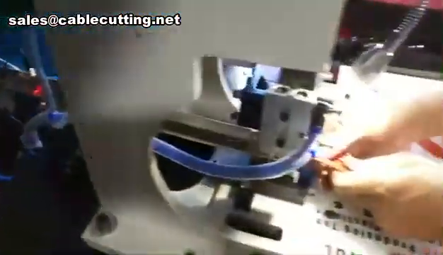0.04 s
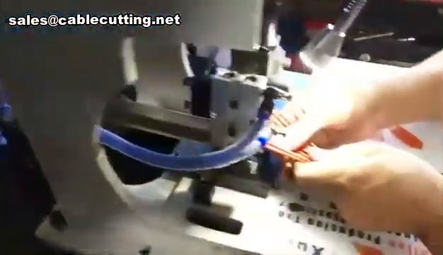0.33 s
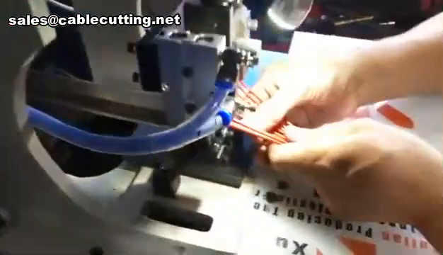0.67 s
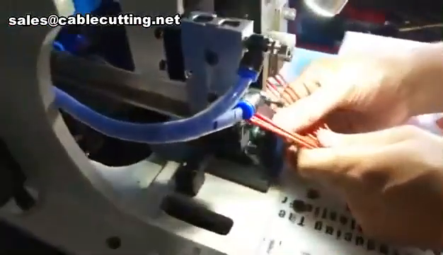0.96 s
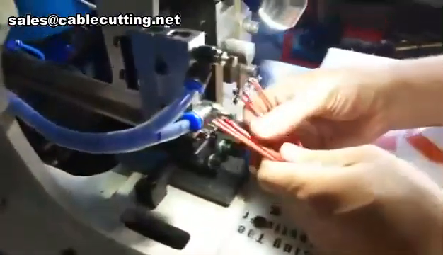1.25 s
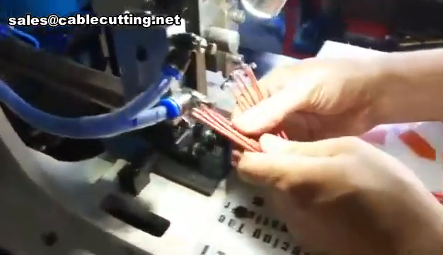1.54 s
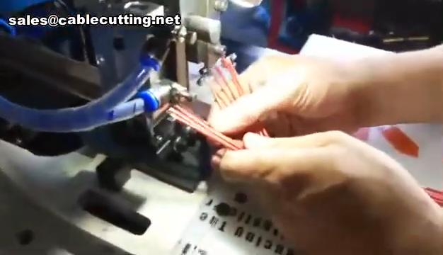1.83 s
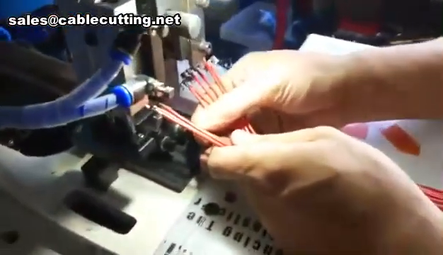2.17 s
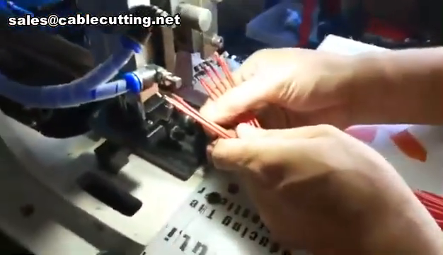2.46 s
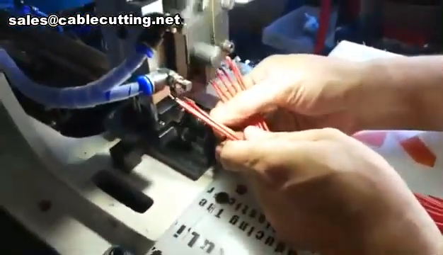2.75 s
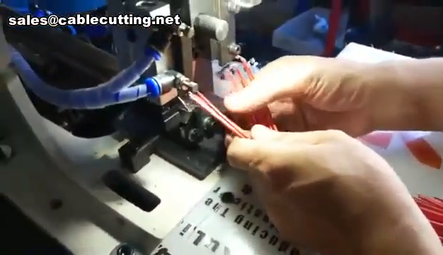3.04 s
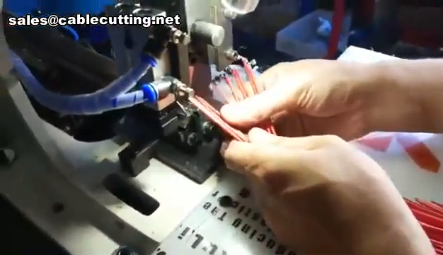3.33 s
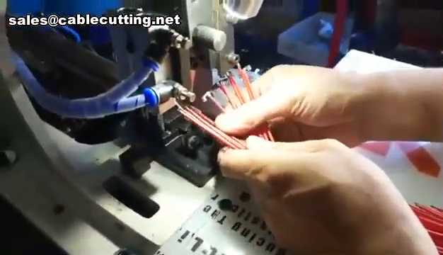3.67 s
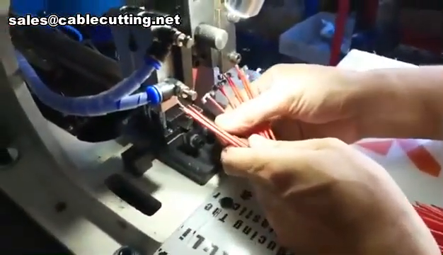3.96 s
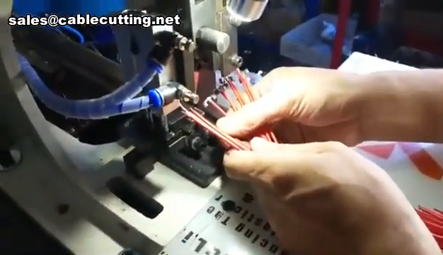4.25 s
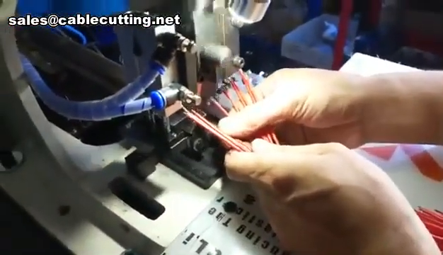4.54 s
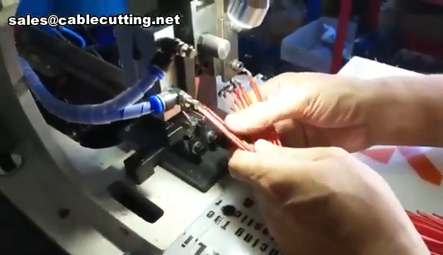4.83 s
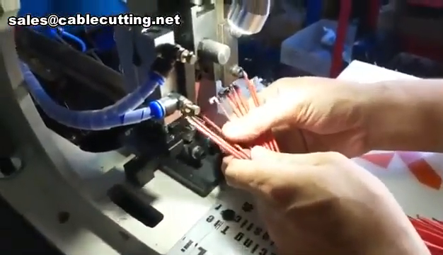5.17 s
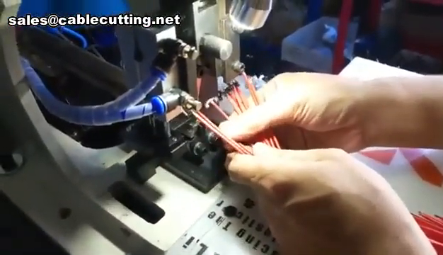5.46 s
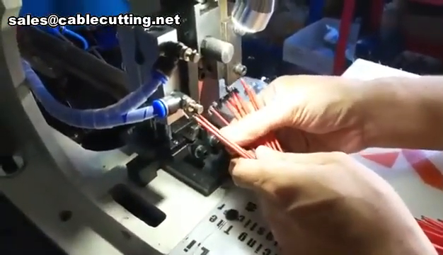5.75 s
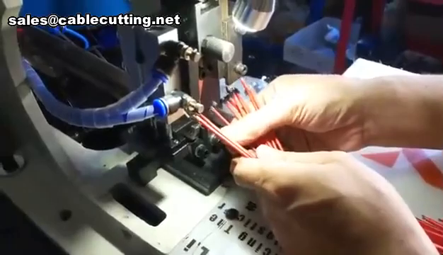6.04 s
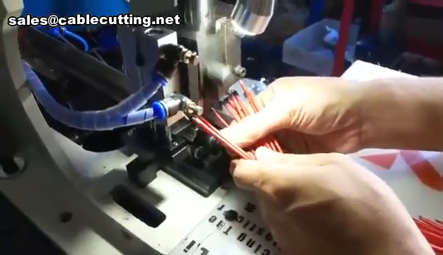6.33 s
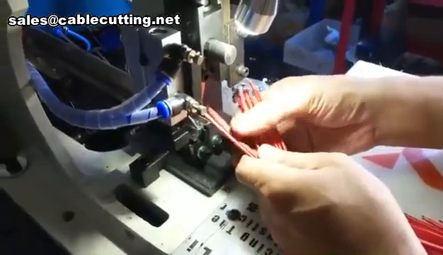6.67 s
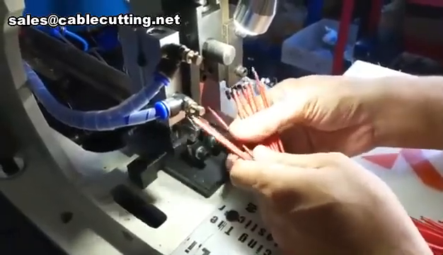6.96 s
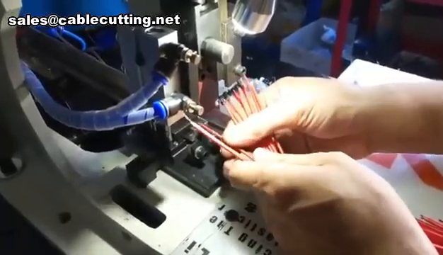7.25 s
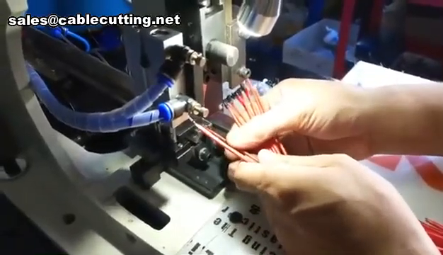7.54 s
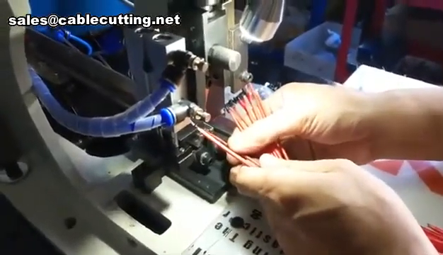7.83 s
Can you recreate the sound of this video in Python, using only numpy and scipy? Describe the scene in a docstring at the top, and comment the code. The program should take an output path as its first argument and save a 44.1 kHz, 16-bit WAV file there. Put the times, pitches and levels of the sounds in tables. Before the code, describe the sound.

A wire crimping press clacks and bangs five times, each stroke followed by a hiss of air, over a growing motor hum.

```python
"""Crimping press in a workshop

The microphone moves up close to the humming motor of a terminal press, the shop murmuring behind.
Five times a wire is slid in, the clutch clacks, the ram rumbles down and crimps, and the crank bangs
on its stop; an air jet hisses after it. Gain control ducks each stroke: the hum sinks and swells back."""
import sys
import numpy as np
from scipy import signal
from scipy.fft import rfft, irfft, next_fast_len
from scipy.io import wavfile
from scipy.ndimage import uniform_filter1d, minimum_filter1d, map_coordinates

SR = 44100
rng = np.random.default_rng(int(sys.argv[2]) if len(sys.argv) > 2 else 0)


def wav_record(signal):
    """Record a signal, one row per channel, as 16-bit PCM in the file named by sys.argv[1]."""
    frames = np.transpose(np.atleast_2d(signal))
    bounded = np.clip(frames, -1, 1)
    # unit amplitude maps onto the largest positive 16-bit level
    quanta = np.round(bounded * 32767).astype(np.int16)
    wavfile.write(sys.argv[1], SR, quanta)


N = 357033
T = np.arange(N) / SR
MAINS_HZ = 50

# press cycles, timed from the clutch: t/s, pawl/dB, bite/dB, crimp/dB, stop/dB, ram/dB, air jet/dB
STROKES = [(0.8986, 2, 0, -5.5, 0, -2, -16), (2.767, -2, -6.5, 0, -0.5, -1, -16),
           (4.499, 2, 0, 0.5, 0.5, 0.5, -15), (6.3182, -3, 0.5, 1, 1.5, 0, -14),
           (8.001, 0.5, -0.5, -2, -4.5, -4, -16.5)]
# modes of the clutch and of the crimping die: f/Hz, level/dB, t60/s
CLUTCH_MODES = [(705, -2, 0.055), (960, -7.5, 0.042), (1187, -9.5, 0.091), (1336, -2, 0.066),
                (1565, -11.5, 0.093)]
DIE_MODES = [(814, 0.5, 0.048), (1227, -2.5, 0.069), (1312, -1.5, 0.088), (1390, -2, 0.18),
             (1453, -3, 0.049), (1590, -6.5, 0.17), (1797, 1, 0.1), (1997, -9.5, 0.097), (2264, -7, 0.094),
             (2432, -2, 0.17), (2803, -6.5, 0.17), (3330, -13, 0.079), (3500, -4.5, 0.1)]
# spectra of the blades closing and of a heavy steel blow: f/Hz, level/dB
SNAP_SPECTRUM = [(300, -20.5), (800, -1), (1500, 2.5), (2200, -0.5), (2700, -10), (3500, -1), (4200, -9),
                 (4800, -7.5), (7500, -12)]
CLUNK_SPECTRUM = [(100, -7), (350, -3), (480, -10.5), (660, 5.5), (950, -7.5), (1300, -9), (1900, -16.5),
                  (3500, -16), (7500, -17.5)]


def amp(db):
    return 10 ** (np.asarray(db) / 20)


def unit(x):
    return x / np.sqrt(np.mean(x ** 2) + 1e-20)


def along(points, hz):
    """Read (f/Hz, value) points on a log frequency axis."""
    f, v = np.transpose(points)
    return np.interp(np.log(hz + 1), np.log(f + 1), v)


def wobble(rate):
    """A smooth random curve, rate knots a second."""
    return map_coordinates(rng.standard_normal(int(N * rate / SR) + 4), [T * rate])


def gate(length, rise, fall):
    """A one-second envelope that opens at 0 and closes after length seconds."""
    t = T[:SR]
    return (1 - np.exp(-t / rise)) * np.exp(-np.maximum(t - length, 0) / fall)


def add(track, s, sound):
    """Mix a sound in at time s."""
    part = track[:, round(s * SR):][:, :sound.shape[1]]
    part += sound[:, :part.shape[1]]


def spread(hz):
    """Angle between mid and side at the stereo microphone."""
    likeness = [(100, 0.98), (300, 1), (500, 0.68), (1000, 0.37), (1900, -0.35), (4000, 0.071),
                (5500, -0.086), (7300, 0.94)]  # f/Hz, left-right correlation
    return np.arccos(np.clip(along(likeness, hz), -1, 1)) / 2


def noise(gain, size):
    """Stereo noise of rms 1, coloured by a gain of frequency."""
    m = next_fast_len(size)
    hz = np.fft.rfftfreq(m, 1 / SR)
    coloured = rfft(rng.standard_normal((2, m))) * gain(hz)
    mid, side = irfft(coloured * [np.cos(spread(hz)), np.sin(spread(hz))], m)[:, :size]
    return unit(np.array([mid + side, mid - side]))


def rush(spectrum, size=SR):
    """Stereo noise with a given spectral shape."""
    return noise(lambda hz: amp(along(spectrum, hz)), size)


def peak(hz, centre_hz, width_hz):
    """A resonance curve of height 1."""
    return 1 / (1 + (2 * (hz - centre_hz) / width_hz) ** 2)


def narrow(centre_hz, width_hz):
    """Stereo noise in one resonance."""
    return noise(lambda hz: peak(hz, centre_hz, width_hz), N)


def burst(spectrum, t60):
    """The dense, quickly dying part of a blow."""
    t = T[:SR]
    contact = 1 - np.exp(-t / .0007)
    return rush(spectrum) * amp(-60 * t / t60) * contact


def ring(modes):
    """Struck modes, varying in strength from blow to blow and slightly shifted by the load."""
    t, out = T[:SR // 2], np.zeros((2, SR))
    for hz, db, t60 in modes:
        phase = 0.66 * rng.standard_normal() + spread(hz) * np.array([[1], [-1]])
        loaded_hz = hz * (1 + 0.0036 * rng.standard_normal())
        decay = amp(db + rng.normal(0, 1) - 60 * t / t60)
        out[:, :len(t)] += decay * np.sin(2 * np.pi * loaded_hz * t + phase)
    return out * (1 - np.exp(-T[:SR] / .0008))


def motor():
    """Magnetic hum at twice the mains, overtones and whirring bearings grow as the microphone nears."""
    approach = [(0, -20.5, -34), (.8, -17.5, -12), (1.95, -16.5, -11), (2.3, -7.5, -11.5), (2.7, -2, -4),
                (4.2, -0.5, 1), (8.1, 1, 0.55)]  # the walk up to the motor: t/s, hum/dB, overtones and whir/dB
    # the hum's overtones and its odd-order buzz: multiple of the mains, level/dB
    overtone_orders = [(4, 0.5), (6, -3), (8, -13), (10, -16), (12, -26.5), (13, -23.5), (14, -17.5),
                       (18, -18), (20, -16), (22, -25), (34, -24)]
    buzz_orders = [(1, -15.5), (3, -9), (5, -6), (7, -7)]
    whine_bands = [(925, 55, -18), (1177, 33, -12.5), (1395, 20, -20.5), (1459, 31, -19), (1559, 31, -16),
                   (1684, 21, -17), (1885, 26, -21)]  # bearings: f/Hz, width/Hz, level/dB
    whir_spectrum = [(25, -24), (50, -11.5), (120, 8.5), (330, -0.5), (480, -3.5), (900, -5), (1350, -14),
                     (2000, -11.5), (2700, -4.5), (3700, -4.5), (4700, -10), (5600, -8.5), (7200, -9)]  # running noise: f/Hz, level/dB
    times, *levels = np.transpose(approach)
    near_db, bright_db = [np.interp(T, times, db) for db in levels]
    mains_phase = 2 * np.pi * MAINS_HZ * T + 0.019 * wobble(5)

    def stack(orders):
        return sum(np.sqrt(2) * amp(db + 0.96 * wobble(8.3) + 0.44 * wobble(48))
                   * np.sin(k * mains_phase + rng.uniform(0, 2 * np.pi)) for k, db in orders)

    pull = np.sin(2 * mains_phase)
    hum = amp(-20.5 + near_db) * np.sqrt(2) * pull * amp([[-1.1], [1.1]])  # a little to the right
    # the buzz dies away after each stroke and builds up again
    lull = sum(np.exp(-((T - s - .65) / 0.29) ** 2) for s, *_ in STROKES)
    overtones = amp(-28.5 + bright_db) * (stack(overtone_orders) + amp(-11 * lull) * stack(buzz_orders))
    whine = sum(amp(db + wobble(22)) * narrow(hz, width) for hz, width, db in whine_bands)
    whir = rush(whir_spectrum, N) * (1 + 0.061 * pull) * amp(1.8 * wobble(9.7))
    return hum + overtones + amp(-26 + bright_db) * (amp(-1) * whir + whine + amp(-2.5) * loose_parts())


def loose_parts():
    """Four loose parts shaken by the hum tap near each crest, mostly lightly, in flurries."""
    tap_spectrum = [(400, -18.5), (900, -6.5), (1500, 4.5), (2000, -9.5), (2700, -7), (3700, 2),
                    (4400, -10.5), (7500, -1.5)]  # a tap on the frame: f/Hz, level/dB
    part_modes = [(2245, 0, 0.14), (2400, -4, 0.1), (2580, -1, 0.058), (2670, -6.5, .06), (3380, 0.5, .035),
                  (3510, -0.5, .035), (3660, -1, 0.046), (3680, -2.5, .03), (3840, -2.5, 0.05),
                  (3800, -9, 0.055), (4700, -6, 0.099)]  # the parts ringing: f/Hz, level/dB, t60/s
    crests = np.arange(0, T[-1] - .01, 1 / (2 * MAINS_HZ))
    chatter = np.zeros((2, N))
    for modes in np.array_split(part_modes, 4):
        times = crests + .003 * rng.standard_normal(len(crests))
        at = np.clip(times * SR, 0, N - 1).astype(int)
        uneven_db = 6.5 * rng.uniform(-1.8, 1, len(at))
        flurry_db = 5.5 * wobble(14)[at]
        taps = np.zeros(N)
        taps[at] = amp(uneven_db + flurry_db) * rng.choice([-1, 1], len(at))
        tap = burst(tap_spectrum, t60=0.058) + amp(-3) * ring(modes)
        chatter += unit(signal.fftconvolve(taps[None], tap[:, :SR // 8], axes=1)[:, :N])
    return unit(chatter)


def shop():
    """The murky din of the shop, with another machine singing and humming farther off."""
    din_spectrum = [(25, -25), (60, -7), (95, -8), (170, -7.5), (250, -5), (350, -9.5), (450, -14.5),
                    (800, -14.5), (1500, -17.5), (2000, -17), (2500, -16), (3700, -25.5), (5500, -26.5),
                    (7500, -25)]  # room tone: f/Hz, level/dB
    whine_bands = [(803, 14, -48.5), (2510, 160, -47)]  # the far machine's whine: f/Hz, width/Hz, level/dB
    hum_tones = [(248, -41.5), (350, -44)]  # its hum: f/Hz, level/dB
    din = amp(-31.5) * rush(din_spectrum, N) * amp(1.4 * wobble(20))
    whine = sum(amp(db) * narrow(hz, width) for hz, width, db in whine_bands)
    hum = sum(np.sqrt(2) * amp(db + 0.99 * wobble(3.1)) * np.sin(2 * np.pi * hz * T + .5 * wobble(3.7))
              for hz, db in hum_tones)
    swell_db = np.interp(T, [0, 5.9], [0, 1])
    return din + whine + hum * amp(swell_db)


def scrape(length, fizz_db):
    """Metal or wire sliding with an uneven grip, with a bright fizz on top."""
    # spectra of the friction and of its fizz: f/Hz, level/dB
    scrape_spectrum = [(300, -15), (800, -1), (1800, -3.5), (2600, 4), (3800, 1.5), (5200, -4.5),
                       (7500, -21.5)]
    fizz_spectrum = [(2000, -34), (4500, -15.5), (5700, -5), (6600, 10.5), (7500, -5.5)]
    grip = amp(1.4 * wobble(110)[:SR]) * gate(length, rise=0.0017, fall=0.0038)
    return grip * (rush(scrape_spectrum) + amp(fizz_db) * rush(fizz_spectrum))


def knock(modes, t60, ring_db, rise):
    """A light, cushioned knock on a small steel part."""
    tick_spectrum = [(150, -8.5), (450, -2.5), (850, -3), (1500, -3.5), (2600, -4.5), (5000, -6.5),
                     (7500, -10.5)]  # the contact: f/Hz, level/dB
    cushion = 1 - np.exp(-T[:SR] / rise)
    return (amp(1) * burst(tick_spectrum, t60) + amp(ring_db) * ring(modes)) * cushion


def handling():
    """The light sounds around the strokes: wires knock and slide, the pawl rubs, the air valve shuts."""
    knocks = [(.729, -17), (2.593, -16.5), (4.327, -16), (4.343, -16.5), (6.143, -16), (6.164, -21),
              (6.869, -20), (7.831, -14)]  # wire ends meet the wire stop, which trips the press: t/s, level/dB
    drags = [(3.99, 0.055, -33.5, -10), (5.72, 0.059, -30.5, -19.5), (5.959, 0.061, -38, -16),
             (6.852, 0.04, -13, -3.5), (6.889, 0.037, -13.5, -16), (6.92, 0.027, -21, -18),
             (6.952, 0.07, -20.5, -9), (7.679, 0.099, -24.5, -28), (7.887, 0.027, -22.5, -9)]  # the bundle dragged over the die: t/s, length/s, level/dB, relative fizz/dB
    # modes of the wire stop and of the air valve's block: f/Hz, level/dB, t60/s
    wire_stop_modes = [(720, -0.5, 0.089), (936, 4, 0.1), (978, -2.5, 0.19), (1157, 0, 0.1),
                       (1516, -5.5, .12), (2380, -3.5, 0.23), (2630, -2, .12), (4080, -3.5, .08),
                       (4340, -2.5, .1)]
    valve_modes = [(415.5, -2, 0.17), (740, -4.5, 0.11), (866, -0.5, 0.097), (1170, -5, .1),
                   (2060, -4, 0.14), (3170, -2, 0.21), (3400, -6, .18), (4000, -15, .15)]
    out = np.zeros((2, N))
    for s, db in knocks:
        add(out, s, amp(db) * knock(wire_stop_modes, t60=0.061, ring_db=-7, rise=0.0031))
    for s, *_ in STROKES:
        add(out, s - .18, amp(-29.5) * scrape(length=0.053, fizz_db=-6.5))  # the wire rasps on its stop
        add(out, s - .075, amp(-41) * scrape(length=0.036, fizz_db=10))  # the terminal slides
        add(out, s - .016, amp(-23) * scrape(length=0.023, fizz_db=-6))  # the pawl rubs
        add(out, s + .678, amp(-12) * knock(valve_modes, t60=0.11, ring_db=-6, rise=0.0028))
    for s, length, db, fizz_db in drags:
        add(out, s, amp(db) * scrape(length, fizz_db))
    return out


def clutch(out, s, pawl_db, bite_db):
    """The pawl snaps in with a bright chink and skips onto a ringing tooth, then the clutch bites."""
    # spectra of the pawl's chink and of the bite: f/Hz, level/dB
    chink_spectrum = [(300, -6.5), (1000, -1), (2200, 1), (2700, -8.5), (3200, -1), (4000, -1), (4500, -13),
                      (7500, -8.5)]
    clack_spectrum = [(200, -17), (500, -14), (1000, 1), (2000, -13.5), (3800, -15.5), (4800, -14.5),
                      (7500, -17.5)]
    # modes of the pawl and of the tooth: f/Hz, level/dB, t60/s
    pawl_modes = [(2360, -10.5, 0.065), (2920, -9, .02), (3130, -13, 0.025), (3280, -2.5, 0.021),
                  (3420, -2.5, 0.041), (3680, -3.5, 0.023), (3940, -3.5, 0.039), (4860, -14, .03),
                  (5650, -15.5, 0.049), (7030, -18, 0.042)]
    tooth_modes = [(1788, -7, 0.05), (1943, 1, 0.056), (2014, -6.5, 0.078)]
    skip_s, bite_s = .0062, .0115
    for after, share_db in [(0, 0), (skip_s, -2.5)]:
        chink = amp(-1) * burst(chink_spectrum, t60=0.027) + amp(-9) * ring(pawl_modes)
        add(out, s + after, amp(pawl_db + share_db) * chink)
    add(out, s + skip_s, amp(bite_db - 2.5) * ring(tooth_modes))
    clack = amp(-4.5) * burst(clack_spectrum, t60=0.08) + amp(-4) * ring(CLUTCH_MODES)
    add(out, s + bite_s, amp(bite_db) * clack)


def ram(out, s, ram_db):
    """The ram grinds down its slide in jolts that thud in the frame and rattle the die."""
    grind_spectrum = [(25, -35), (50, -28.5), (100, 0), (270, 2), (390, 4.5), (480, -14.5), (720, -1.5),
                      (1050, -9.5), (1400, -14), (2200, -10), (3600, -16), (4600, -24), (6200, -24),
                      (7500, -30.5)]  # the slide: f/Hz, level/dB
    jolts = [(.021, -7, -14), (.033, -22.5, -19), (.049, -7.5, -13.5), (.066, -2.5, -16.5),
             (.082, -2, -14.5), (.100, -11, -20)]  # jerks of the ram: t/s after the clutch, thud/dB, rattle/dB
    # modes of the ram's dead weight and of the frame: f/Hz, level/dB, t60/s
    weight_modes = [(151, -10.5, 0.066), (255, 0.5, .04), (354, -1, 0.049), (393, -6, 0.044)]
    frame_modes = [(61.6, -19, 0.05), (102, -4.5, 0.23), (149.4, 0.5, 0.7), (210, -3.5, 0.18),
                   (258, 3.5, 0.084), (350, -3, 0.2), (400, -6, 0.15), (699, -4.5, 0.086), (947, -4, 0.28)]
    grind = rush(grind_spectrum) * gate(length=0.076, rise=0.012, fall=0.02)
    add(out, s + .016, amp(ram_db - 7) * grind)
    for after, thud_db, rattle_db in jolts:
        boom = amp(thud_db) * (amp(-3.5) * ring(weight_modes) + amp(-11) * ring(frame_modes))
        rattle_gain = amp(rattle_db + rng.standard_normal())
        rattle = amp(-2) * ring(DIE_MODES) + amp(-2.5) * burst(CLUNK_SPECTRUM, t60=0.037)
        rattle += amp(1) * burst(SNAP_SPECTRUM, t60=0.021)
        add(out, s + after + .0012 * rng.standard_normal(), amp(ram_db) * (boom + rattle_gain * rattle))


def crimp(out, s, crimp_db, ram_db):
    """The blades snap shut on the terminal, the load knocks back through the clutch, the ram lands."""
    bench_modes = [(62.6, -12.5, 0.11), (86.5, -14, .1), (101, 1.5, 0.44)]  # the bench under the press: f/Hz, level/dB, t60/s
    snap = amp(-3) * burst(SNAP_SPECTRUM, t60=0.042) + amp(-12) * ring(DIE_MODES)
    add(out, s + .0385, amp(crimp_db) * snap)
    add(out, s + .043, amp(ram_db - 13) * ring(CLUTCH_MODES))
    add(out, s + .083, amp(ram_db - 14) * ring(bench_modes))


def crank_stop(out, s, stop_db):
    """The crank hits its stop and rebounds once."""
    stop_modes = [(643.4, -2, 0.09), (681, -3.5, 0.06), (800, -5, 0.07), (953.7, -5, 0.15),
                  (1293, -11, 0.096)]  # the stop ringing: f/Hz, level/dB, t60/s
    for after, share_db in [(0, 1), (.0105, -4)]:
        bang = amp(-2) * burst(CLUNK_SPECTRUM, t60=0.15) + amp(-7) * ring(stop_modes)
        add(out, s + .138 + after, amp(stop_db + share_db) * bang)


def press():
    """One turn of the crank for each stroke."""
    out = np.zeros((2, N))
    for s, pawl_db, bite_db, crimp_db, stop_db, ram_db, _ in STROKES:
        clutch(out, s, pawl_db, bite_db)
        ram(out, s, ram_db)
        crimp(out, s, crimp_db, ram_db)
        crank_stop(out, s, stop_db)
    return out


def air_jet():
    """The valve opens on the upstroke; the jet sputters and weakens as the hose pressure sags."""
    jet_spectrum = [(300, -15.5), (900, -14.5), (1800, -20), (2400, -2), (3200, 0.5), (4200, 1), (5200, 0),
                    (6400, -0.5), (7200, 3), (7800, -1)]  # escaping air: f/Hz, level/dB
    nozzle = [(3170, 95, 3), (3740, 96, 2.5), (4070, 110, 4), (4690, 240, 1), (5420, 220, 2),
              (6070, 390, 3.5), (7200, 150, -4.5)]  # resonances of the nozzle and the gap it blows into: f/Hz, width/Hz, lift/dB

    def colour(hz):
        lift_db = sum(db * peak(hz, centre, width) for centre, width, db in nozzle)
        return amp(along(jet_spectrum, hz) + lift_db)

    out, t = np.zeros((2, N)), T[:SR]
    opening = 1 / (1 + np.exp(-(t - .04) / 0.0044))
    valve = opening * gate(length=0.6405, rise=.003, fall=0.018)
    pressure_db = 10 * np.exp(-t / 0.18)
    for s, *_, air_db in STROKES:
        spit = unit(narrow(7200, 600)[:, :SR] * amp(4 * wobble(45)[:SR]))
        jet = noise(colour, SR) + amp(-8 - 9.5 * t) * spit
        sputter = amp(0.68 * wobble(170)[:SR])
        add(out, s + .045, amp(air_db + pressure_db) * unit(jet * sputter) * valve)
    return out * amp([[.8], [-.8]])  # a little to the left


def hall(x):
    """The workshop's reverberation, longest in the bass."""
    decay_times = [(100, 0.98), (700, 0.52), (3000, 0.85), (8000, 0.31)]  # the room's decay: f/Hz, t60/s
    hz, t, bands = signal.stft(noise(np.ones_like, SR), SR, nperseg=256)
    tail = signal.istft(bands * amp(-60 * t / along(decay_times, hz)[:, None]), SR, nperseg=256)[1]
    return signal.fftconvolve(x, tail / np.linalg.norm(tail[0]), axes=1)[:, :N]


def scene():
    """The press and its motor close by, the shop behind."""
    work = press() + handling()
    return work + amp(-7) * hall(work[:1]) + air_jet() + motor() + shop()


def gain_control(x, ceiling_db, hold_s, release_s):
    """Loud sound pulls the gain down at once; it is held, then creeps back."""
    power = uniform_filter1d(np.mean(x ** 2, axis=0), size=660)
    level_db = 10 * np.log10(np.abs(power) + 1e-12)
    gain_db = np.minimum(ceiling_db - level_db, 0)
    span = int(hold_s * SR / 2) * 2 + 1
    held_cut_db = -minimum_filter1d(gain_db, span, origin=span // 2, mode="nearest")
    fade = np.exp(-T / release_s)
    return x * amp(-fade * np.maximum.accumulate(held_cut_db / fade))


def record(dry):
    """Behind the microphone: gain control, softly rounded peaks and a narrow band."""
    headroom, low_hz, top_hz = .92, 30, 7540
    ducked = gain_control(dry, ceiling_db=-11, hold_s=0.74, release_s=0.33)
    rounded = ducked / (1 + np.abs(ducked / headroom) ** 8) ** (1 / 8)
    m = next_fast_len(N + SR)
    hz = np.fft.rfftfreq(m, 1 / SR)
    band = hz ** 3 / (hz ** 3 + low_hz ** 3) / (1 + (hz / top_hz) ** 220)
    return irfft(rfft(rounded, m) * band, m)[:, :N]


dry = scene()
out = record(dry)
wav_record(out)
```